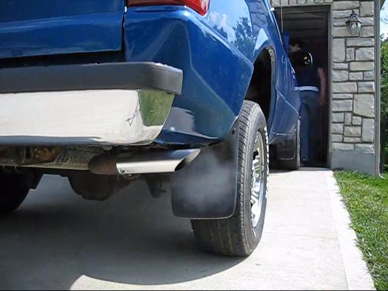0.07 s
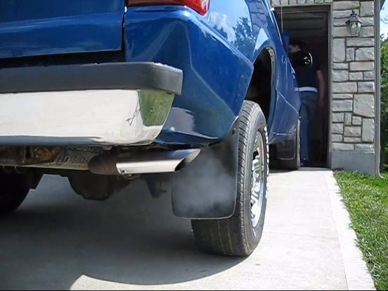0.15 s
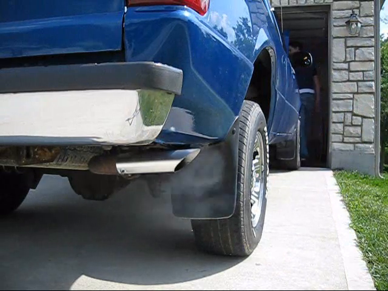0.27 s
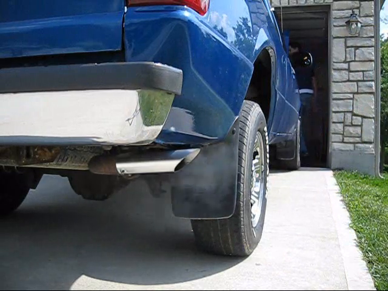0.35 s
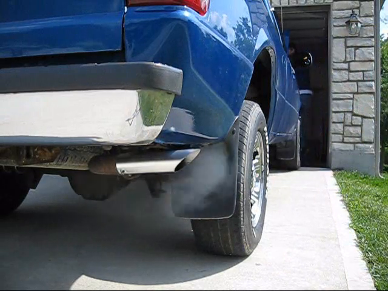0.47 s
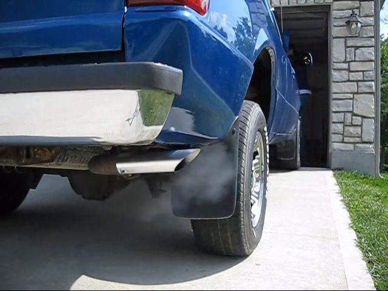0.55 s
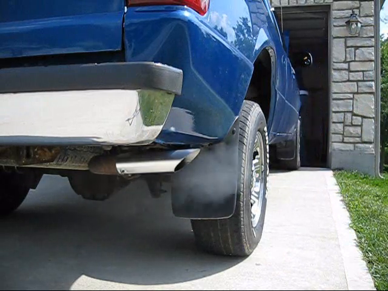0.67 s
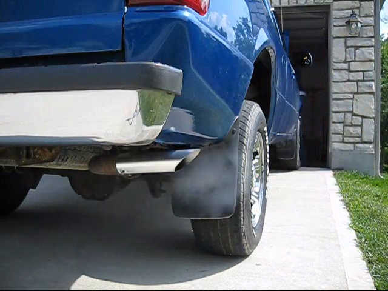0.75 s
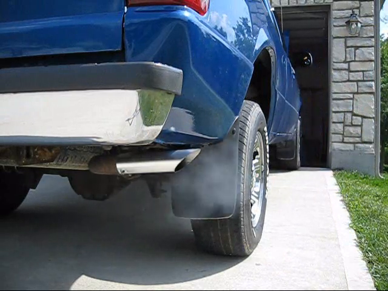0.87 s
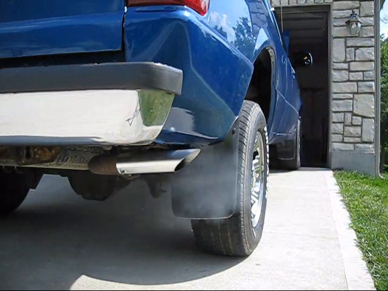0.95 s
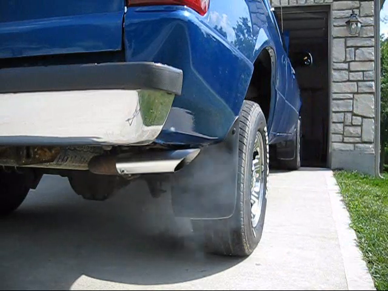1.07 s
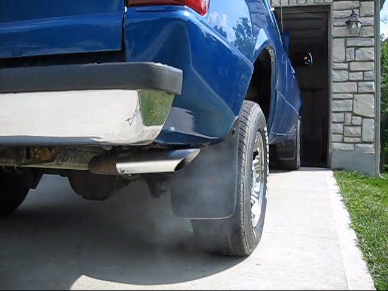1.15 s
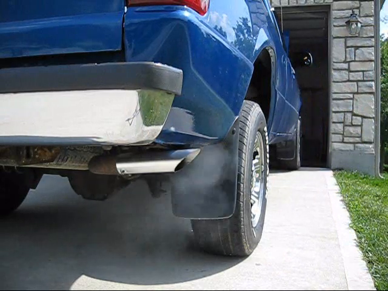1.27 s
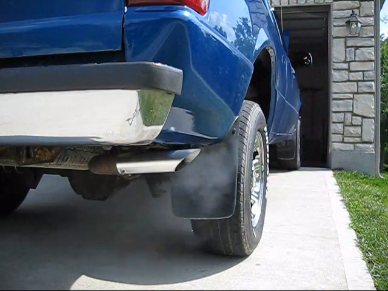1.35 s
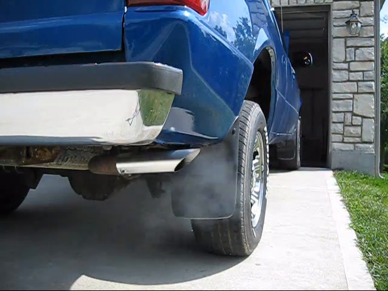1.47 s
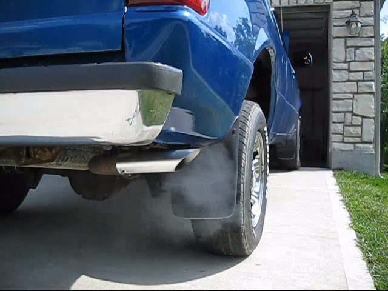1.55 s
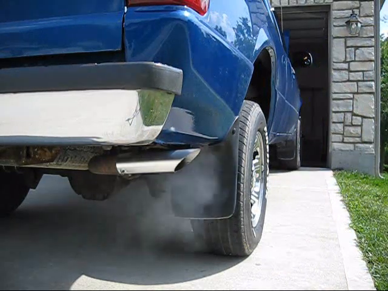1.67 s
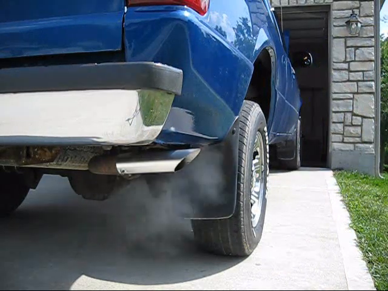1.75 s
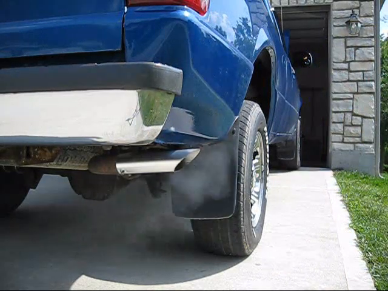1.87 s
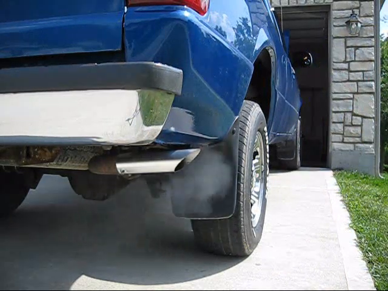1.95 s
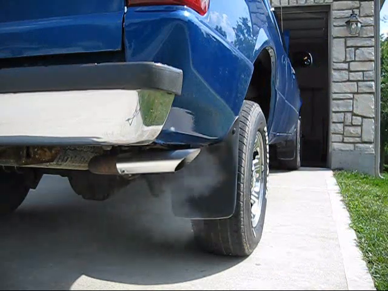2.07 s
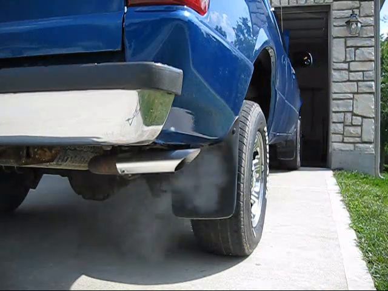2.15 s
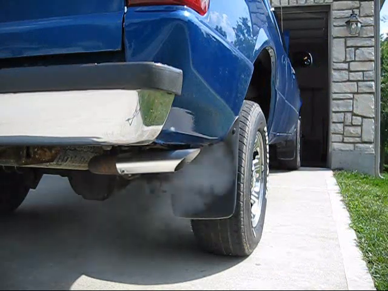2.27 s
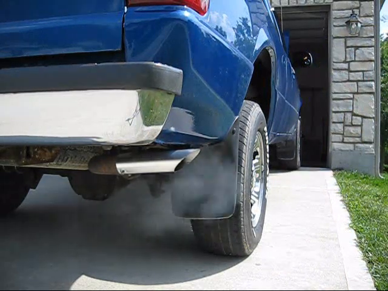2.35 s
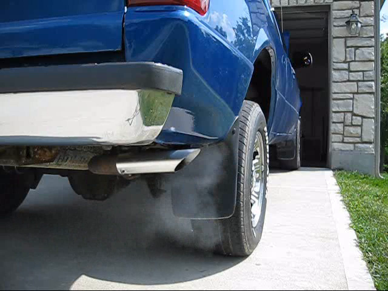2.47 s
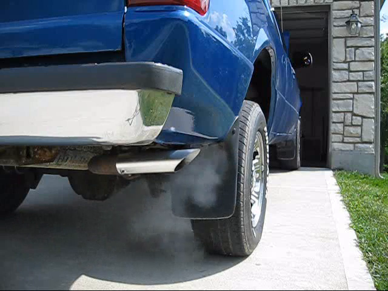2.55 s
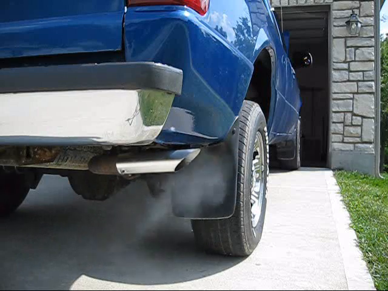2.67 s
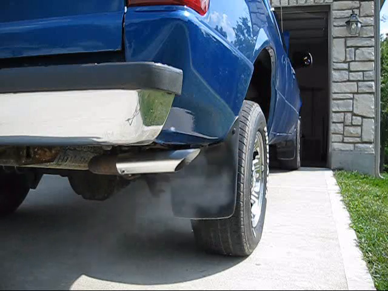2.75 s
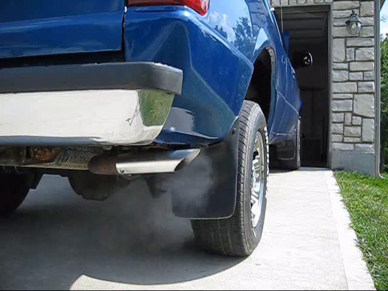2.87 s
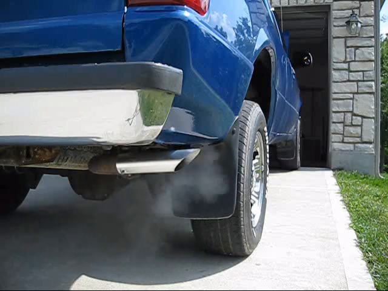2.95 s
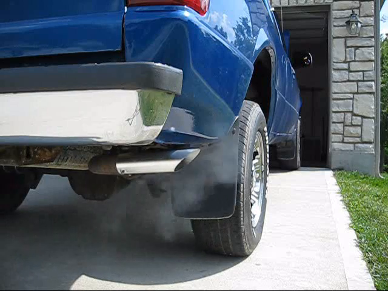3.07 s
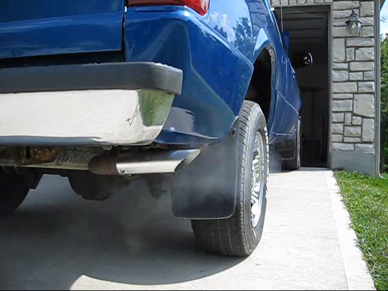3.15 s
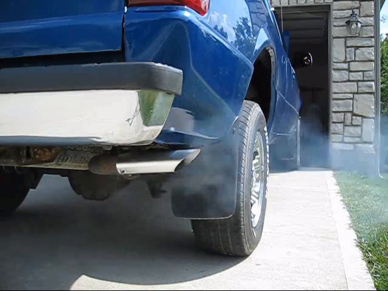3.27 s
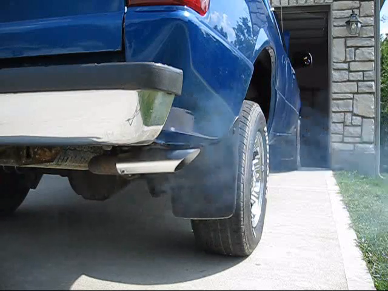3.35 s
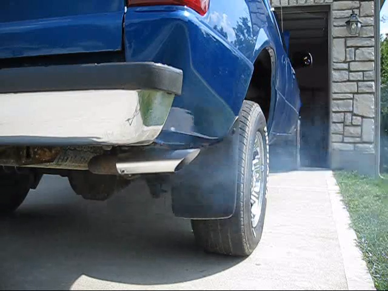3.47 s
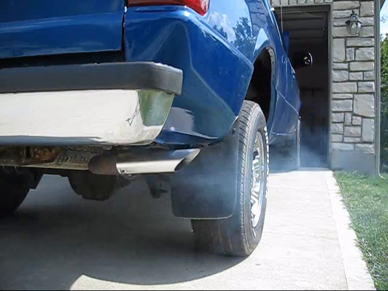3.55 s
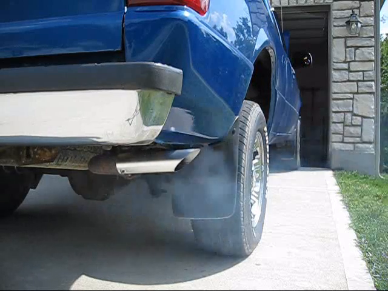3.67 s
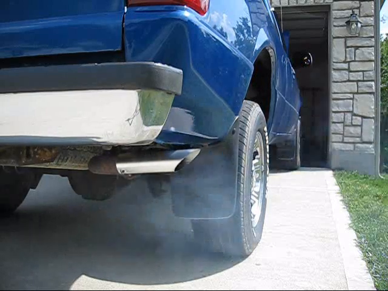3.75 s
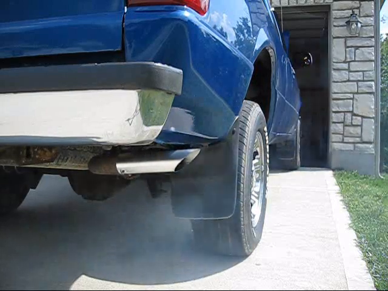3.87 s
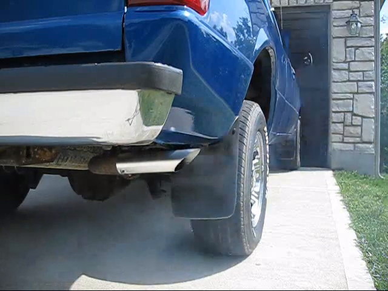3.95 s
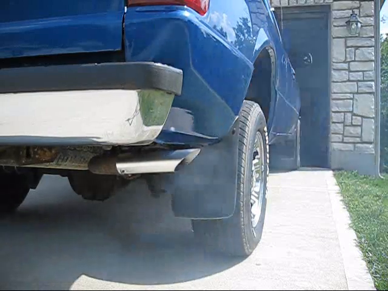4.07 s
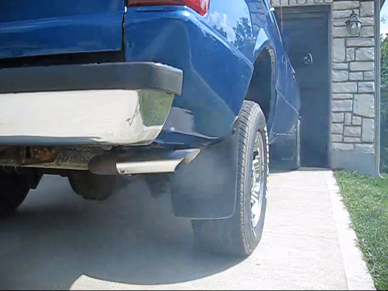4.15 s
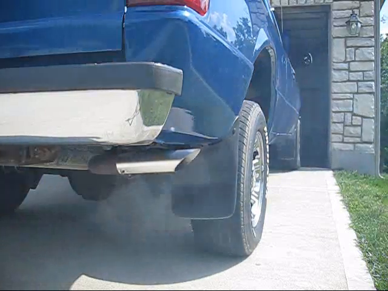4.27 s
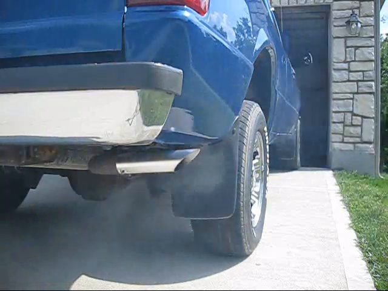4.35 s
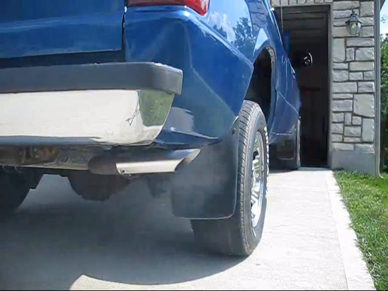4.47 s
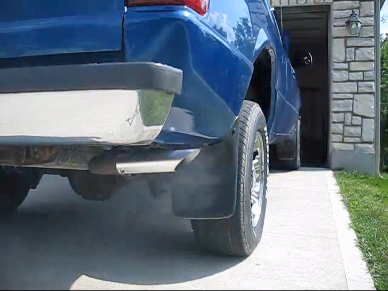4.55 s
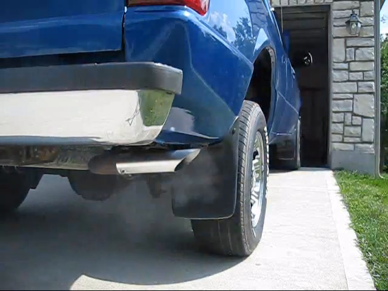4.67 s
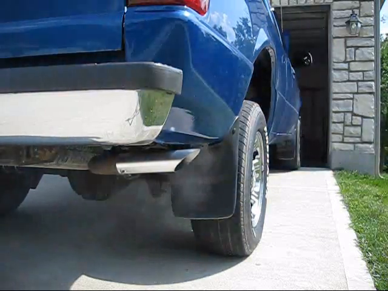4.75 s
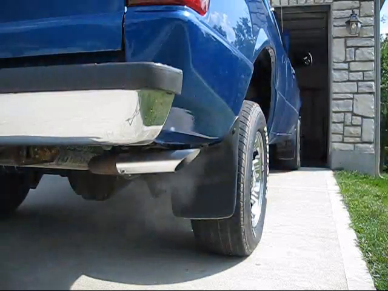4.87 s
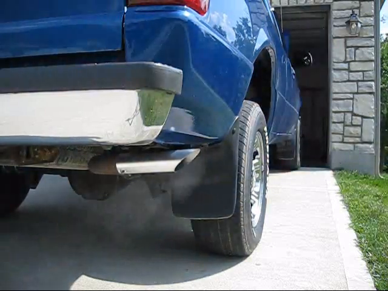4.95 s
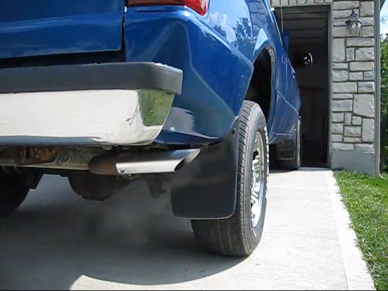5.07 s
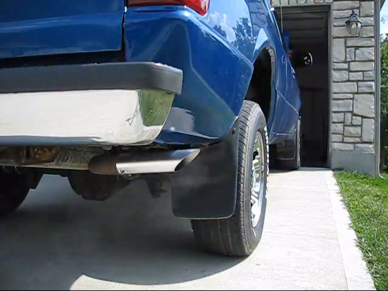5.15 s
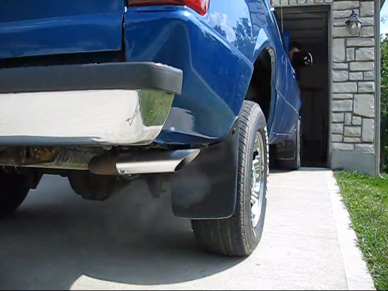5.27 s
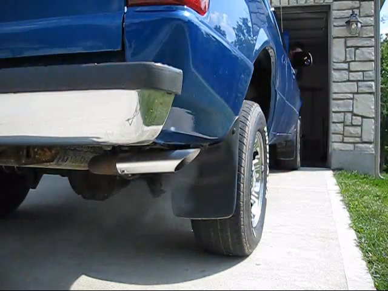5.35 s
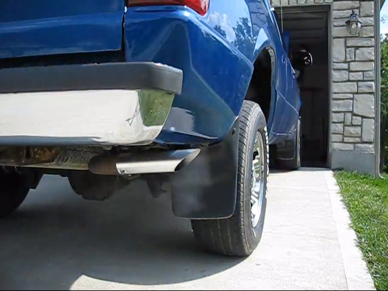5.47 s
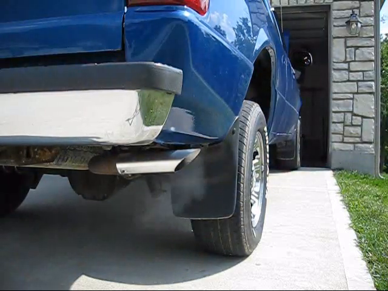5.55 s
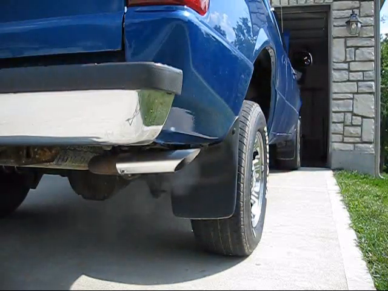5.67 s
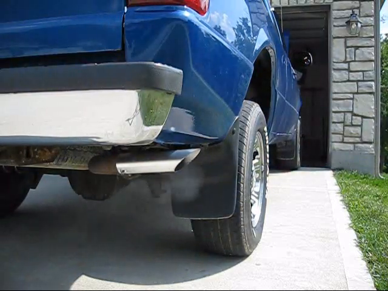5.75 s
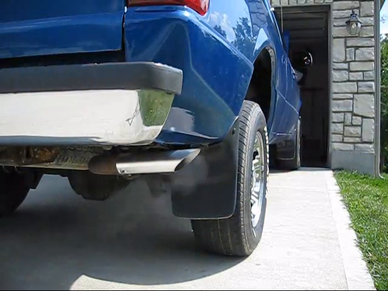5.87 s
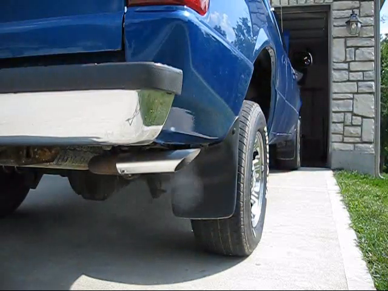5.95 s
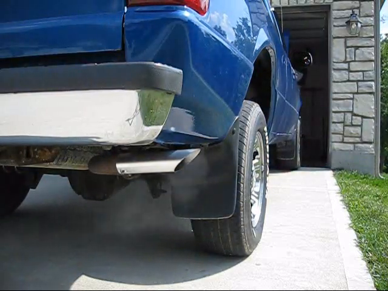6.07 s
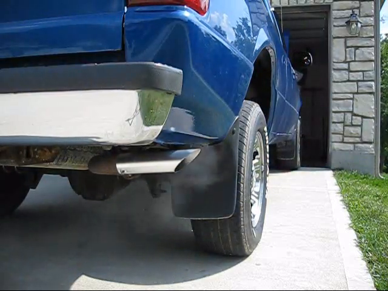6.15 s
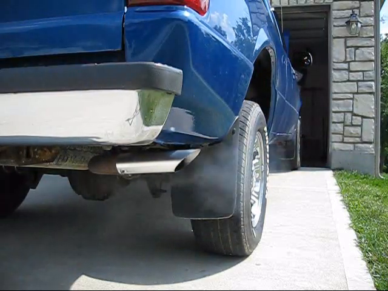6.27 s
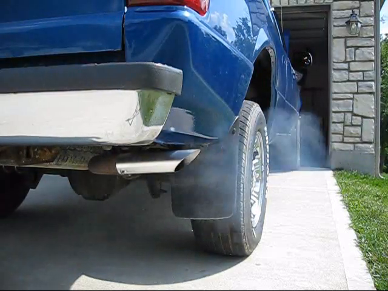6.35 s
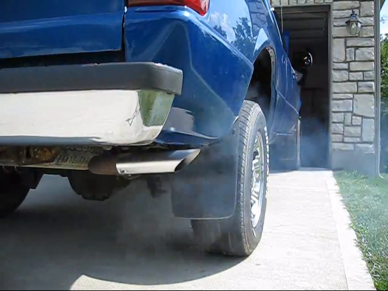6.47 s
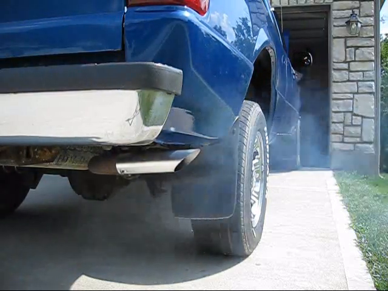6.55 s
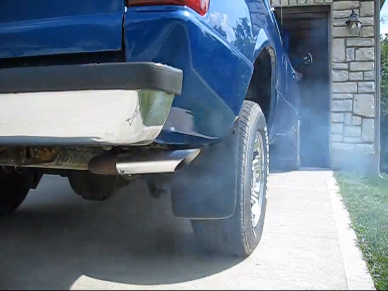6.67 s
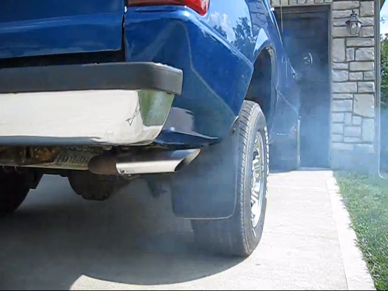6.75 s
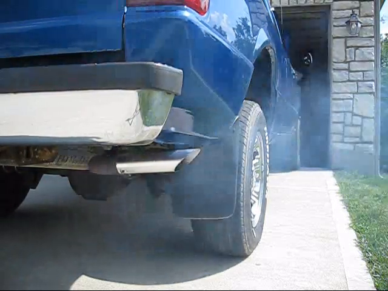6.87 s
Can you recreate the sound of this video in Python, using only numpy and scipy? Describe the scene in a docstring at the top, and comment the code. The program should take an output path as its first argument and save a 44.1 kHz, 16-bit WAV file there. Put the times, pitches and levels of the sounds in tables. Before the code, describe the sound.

A six-cylinder pickup idles outdoors, heard close to the tailpipe. For the first three seconds the exhaust throbs low and evenly, with a steady rush and hiss of gas and a very faint high belt squeak. A slight puff of wind touches the microphone around 0.6 seconds. At about 3.1 seconds the throttle opens with a short raspy bark, and the engine booms up in pitch, peaking near 3.6 seconds, then sinks back to idle by about 5.5. Gusts flap dully against the microphone around 4.2 to 4.5 seconds and again from 5.3 to 6.4. At about 6.2 seconds a second rev starts with another rasp, climbing higher than the first and staying high until the end, near 7 seconds. The hiss ducks slightly under the loudest booms and then recovers.

```python
"""A six-cylinder pickup idles and is revved twice, heard close to its tailpipe.
Each firing sends a pulse that booms in the pipe and rasps as the throttle opens.
The exhaust gas rumbles, rushes and hisses, and a belt squeaks faintly.
Gusts flap against the microphone of a small camera, mostly between the revs,
and the camera turns itself down under the loudest booms."""
import sys
import numpy as np
from scipy import signal
from scipy.fft import rfft, irfft
from scipy.io import wavfile
from scipy.ndimage import uniform_filter1d

SR = 44100
rng = np.random.default_rng(int(sys.argv[2]) if len(sys.argv) > 2 else 0)


def output_pcm(signal):
    """Save a mono or channel-first signal as 16-bit PCM at the path in sys.argv[1].

    Samples are clipped to [-1, 1] before scaling.
    """
    pcm = np.clip(np.atleast_2d(signal).T, -1, 1) * 32767
    wavfile.write(sys.argv[1], SR, np.round(pcm).astype(np.int16))


N = 304731
TIME = np.arange(N) / SR
BINS_HZ = np.maximum(np.fft.rfftfreq(N, 1 / SR), 1)

# presses of the throttle: t/s, rise/s, hold/s, opening kept afterwards/0-1, fading of the barks/(dB/s)
REVS = [(3.08, 0.22, 0.14, 0, 73), (6.211, 0.22, 0.17, 0.08, 38)]
# standing waves, the notes at which the exhaust pipe rings: f/Hz, width/Hz, level/dB
PIPE_NOTES = [(69.6, 14.8, -10), (139, 17.8, -0.5), (210.3, 18, -3), (277.5, 27, -6.5), (416, 75, -18),
              (770, 150, -8)]
# narrow peaks and one dip that the muffler and pipe tip give the gas noise: f/Hz, width/Hz, lift/dB
TIP_RESONANCES = [(778, 50, 5), (924, 38, 3.5), (1210, 12.5, 7.5), (1538, 8.1, 12.5), (1617, 23, 7),
                  (2250, 380, 14.5), (2180, 45, -15.5), (2907, 58, 6)]
# brief swells and dips of the gas noise: t/s, half length/s, rumble/dB, rush/dB, hiss/dB
GAS_SWELLS = [(2.08, .1, -2, 2, -0.5), (2.904, .08, -1, 3.5, -0.5), (3.71, 0.079, 3, 2, 4.5),
              (4.117, 0.075, 0, 1.5, 1.5), (6.92, 0.057, 2, 6.5, 6.5)]


def from_db(db):
    """Turn decibels into a gain to multiply by."""
    return 10 ** (np.asarray(db) / 20)


def rms_one(x):
    """Scale a signal to an average power of 1."""
    return x / np.sqrt(np.mean(x ** 2) + 1e-20)


def in_time(rows):
    """Join (time, value) points into a curve with a value at every sample."""
    return np.interp(TIME, *np.transpose(rows))


def bell(hz, centre_hz, width_hz):
    """How strongly a resonance answers each frequency, 1 at its centre."""
    return 1 / (1 + (2 * (hz - centre_hz) / width_hz) ** 2)


def noise(gain):
    """Noise of power 1, shaped by a gain for each frequency."""
    return rms_one(irfft(rfft(rng.standard_normal(N)) * gain, N))


def colour(points, resonances=()):
    """Gain at each frequency: a smooth curve with resonances on top."""
    hz, db = np.transpose(points)
    lift_db = sum(lift * bell(BINS_HZ, f, width) for f, width, lift in resonances)
    return from_db(np.interp(np.log(BINS_HZ), np.log(hz), db) + lift_db)


def wander(per_s):
    """A slow random drift with a typical size of 1."""
    return rms_one(np.interp(TIME * per_s, np.arange(1000), rng.standard_normal(1000)))


def per_firing(firings):
    """A random value for each firing, gliding to the next."""
    return np.interp(firings, np.arange(1000), rng.standard_normal(1000))


def puffs(firings, sharpness, scatter_db):
    """A loudness curve that swells at each firing, every time with its own strength."""
    which = np.round(firings).astype(int)
    strength = from_db(scatter_db * np.clip(rng.standard_normal(1000), -2, 2))[which % 1000]
    return rms_one(strength * np.exp(sharpness * (np.cos(2 * np.pi * firings) - 1)))


def throttle(release_s=0.22):
    """How far the throttle is open, 0-1: each press rises, holds and falls back."""
    return sum(np.interp(TIME, s + np.cumsum([0, rise, hold, release_s]), [0, 1, 1, kept])
               for s, rise, hold, kept, _ in REVS)


def level_db(rate, load, idle_db, speed_db, load_db):
    """Start at idle_db; add speed_db at twice idle speed and load_db at full throttle."""
    idle_hz = 35
    return idle_db + speed_db * 2 * (1 - idle_hz / rate) + load_db * load


def in_tune(hz, load, damping=0.65):
    """How well a tone matches a low note of the pipe, about 0-1; fast gas weakens the ringing."""
    return (1 - damping * load) * sum(bell(hz, f, width) for f, width, _ in PIPE_NOTES[:3])


def pipe_ring(x):
    """Each note of the pipe rings on from one pulse to the next."""
    out = 0
    for k, (hz, width, db) in enumerate(PIPE_NOTES):
        r = np.exp(-np.pi * width / SR)
        poles = [1, -2 * r * np.cos(2 * np.pi * hz / SR), r * r]
        ringing = (1 - r * r) / 2 * signal.lfilter([1, 0, -1], poles, x)
        out = out + (-1) ** k * from_db(db) * ringing
    return out


def boom(rate, load, phase, strength):
    """The pulses' tones other than thump and drone swell as they slide through the pipe's notes."""
    # overtones (the halves come from unequal cylinder banks): multiple of the firing rate, level/dB
    overtones = [(1.5, 2), (2.5, -2.5), (3, 0.5), (3.5, -9), (4, -1), (4.5, -10.5), (5, -5.5), (6, -5),
                 (7, -12.5), (8, -9.5)]
    # the boom wavers: t/s, level/dB
    waver = [(0, -0.5), (1.2, 1), (2.7, -1.5), (3.2, 4.5), (4.1, -5), (4.62, -0.5), (5.2, -7), (6.2, 3),
             (6.9, 0.5)]
    db = level_db(rate, load, idle_db=-26, speed_db=12.4, load_db=2.9) + in_time(waver)
    tones = sum(from_db(level) * np.cos(2 * np.pi * multiple * phase) for multiple, level in overtones)
    return from_db(db) * pipe_ring(strength * tones)


def firing_pulses(rate, load, firings, jitter=0.0064, idle_rough_db=3.5):
    """Each firing pushes out one pulse, never quite on time; the fuel burns least evenly at idle."""
    phase = firings + jitter * per_firing(firings)
    strength = from_db(idle_rough_db * rate.min() / rate * per_firing(firings))
    # the firing tone and its octave, thump and drone, grow louder when they match a note of the pipe
    thump_db = level_db(rate, load, idle_db=-51, speed_db=13.9, load_db=20.7)
    thump_db += 22.5 * in_tune(rate, load)
    drone_db = level_db(rate, load, idle_db=-48.5, speed_db=20.23, load_db=15.5)
    drone_db += 12.5 * in_tune(2 * rate, load)
    thump = from_db(thump_db) * np.cos(2 * np.pi * phase)
    drone = from_db(drone_db) * np.cos(4 * np.pi * phase)
    return boom(rate, load, phase, strength) - np.sqrt(2) * strength * (thump + drone)


def gas_rumble(rate, load, firings, swell_db):
    """The jet of gas leaving the pipe rumbles, throbbing with each firing."""
    # deep noise: f/Hz, level/dB
    spectrum = [(15, -34), (30, -17), (48, -18), (65, -5), (110, 3.5), (160, 2), (250, 0), (340, -5),
                (500, -22.5), (900, -49)]
    db = level_db(rate, load, idle_db=-32, speed_db=12.1, load_db=-0.69) + swell_db + wander(per_s=10)
    return from_db(db) * puffs(firings, sharpness=0.19, scatter_db=2.6) * noise(colour(spectrum))


def pipe_echo(reflection, spacing_hz=69.3):
    """Gas noise runs up the pipe and back, which boosts evenly spaced frequencies."""
    return np.abs(1 / (1 - reflection * np.exp(-2j * np.pi * BINS_HZ / spacing_hz)))


def gas_rush(rate, load, firings, swell_db):
    """Gas rushes through the muffler and the pipe tip and makes them ring."""
    # mid-range noise: f/Hz, level/dB
    spectrum = [(200, -9.5), (400, 1.5), (600, 1.5), (800, 0.5), (1100, -2.5), (1400, -3), (1900, -10),
                (2500, -21.5), (3300, -23.5), (4200, -19), (6000, -40)]
    db = level_db(rate, load, idle_db=-34, speed_db=8.34, load_db=2) + swell_db
    flow = noise(colour(spectrum, TIP_RESONANCES) * pipe_echo(reflection=0.21))
    return from_db(db) * puffs(firings, sharpness=0.1, scatter_db=1.43) * flow


def gas_hiss(rate, load, firings, swell_db):
    """The gas also hisses, almost steadily, with a slight flicker."""
    # bright noise: f/Hz, level/dB
    spectrum = [(900, -12.5), (1600, 2), (2300, 4.5), (3100, 6), (3900, 0.5), (4600, 2), (5200, -0.5),
                (6100, -0.5), (7000, -4), (9000, -7), (10300, -5.5), (11700, -5.5), (12500, -7.5)]
    db = level_db(rate, load, idle_db=-36, speed_db=3.6, load_db=0.98) + swell_db
    db += 0.19 * wander(per_s=8.2)
    flow = noise(colour(spectrum) * pipe_echo(reflection=0.2))
    return from_db(db) * puffs(2 * firings, sharpness=0.012, scatter_db=0.75) * flow


def muffler_roar(rate, load, firings):
    """The gas in each pulse roars in the hollow of the muffler, most at high speed."""
    db = level_db(rate, load, idle_db=-56.5, speed_db=19.5, load_db=8.9)
    hollow = bell(BINS_HZ, centre_hz=730, width_hz=210) * pipe_echo(reflection=0.36)
    return from_db(db) * puffs(firings, sharpness=1.0, scatter_db=4.5) * noise(hollow)


def whistles_and_belt(firings):
    """The engine whistles steadily, and its belt squeaks once every six firings."""
    # thin whistles: f/Hz, width/Hz, relative level/dB
    whistles = [(5856, 30, -2), (11292, 15, -9), (11578, 30, -4), (11702, 35, 0)]
    steady = sum(from_db(db) * noise(bell(BINS_HZ, f, width)) for f, width, db in whistles)
    squeak = noise(bell(BINS_HZ, centre_hz=10110, width_hz=140))
    return steady + from_db(-1) * puffs(firings / 6, sharpness=1.6, scatter_db=-1.5) * squeak


def wind_flutter(gusts, edge_s=0.022):
    """Churning air flutters at the microphone for as long as a gust lasts."""
    level = 0
    for s, length, db in gusts:
        inside_s = np.minimum(TIME - s, s + length - TIME)
        level = level + from_db(db) * np.clip(0.5 + inside_s / (2 * edge_s), 0, 1)
    churn = noise(bell(BINS_HZ, centre_hz=230, width_hz=490) ** 2)
    return level * from_db(-11 + 0.3 * wander(per_s=33)) * churn


def small_flaps(gusts, per_s=16, scatter_db=2.5, centre_hz=337, spread_octaves=0.28):
    """Weaker swirls of air arrive unevenly in each gust: rows of t/s, level/dB, f/Hz."""
    rows = []
    for start, length, db in gusts:
        times = np.cumsum(rng.uniform(0.3, 1.7, 60)) / per_s
        scatter = rng.standard_normal((len(times), 2))
        rows += [(start + s, db + scatter_db * louder, centre_hz * 2 ** (spread_octaves * higher))
                 for s, (louder, higher) in zip(times, scatter) if s < length]
    return rows


def wind_flaps(gusts, fade_s=0.0028, grit=0.81):
    """Each swirl that hits the microphone is a dull flap: one pressure swing with rough noise on it."""
    # the hardest flaps: t/s, relative level/dB, f/Hz (sets the pitch of both swing and noise)
    hard_flaps = [(.578, -14, 390), (0.728, -14, 310), (4.25, -4.5, 430), (5.3, -9.5, 388),
                  (5.406, -7.5, 350), (5.449, -9, 350), (5.491, -4.5, 303), (5.506, -7.5, 370),
                  (5.547, -11, 520), (5.575, -4, 410), (5.581, -4.5, 390), (5.623, -5, 415.5),
                  (5.644, -5, 470), (5.762, -7, 338), (5.877, -10.5, 470), (5.91, -1.5, 477),
                  (6.012, -6.5, 507), (6.045, -5.5, 406), (6.064, -4, 523), (6.215, -6, 444),
                  (6.245, -4.5, 590)]
    out, t = np.zeros(N), np.arange(-600, 600) / SR
    for s, db, hz in hard_flaps + small_flaps(gusts):
        lowpass = signal.butter(4, 1.62 * hz, fs=SR, output="sos")
        churn = signal.sosfilt(lowpass, rng.standard_normal(2 * len(t)))[len(t):]
        swing = np.cos(2 * np.pi * (0.79 * hz * t + rng.random()))
        flap = (swing + grit * rms_one(churn)) * np.exp(-np.abs(t / fade_s) ** 1.52)
        start = round(s * SR) - len(t) // 2
        out[start:start + len(t)] += from_db(db) * flap / np.abs(flap).max()
    return signal.sosfilt(signal.butter(6, [90, 1150], "band", fs=SR, output="sos"), out)


def wind():
    """Gusts blow on the microphone: a low flutter with flaps on top."""
    # spells of wind: t/s, length/s, relative level/dB
    gusts = [(0.552, 0.073, -19), (4.218, 0.31, -16), (5.432, 0.45, -13), (5.999, 0.41, -13)]
    return wind_flutter(gusts) + from_db(-0.5) * wind_flaps(gusts)


def rasp(firings, bark_db=-15, rise_db_per_s=197, stop_db_per_s=130):
    """With the throttle open, each pulse sharpens and leaves the pipe as a short bark with a tick."""
    # noise of a bark: f/Hz, level/dB
    spectrum = [(300, -26), (700, 13), (1100, -3), (1500, 12), (1900, -7.5), (2500, -3.5), (3600, -9.5),
                (4600, -15), (6000, -14), (12000, -23)]
    level = 0
    # the barks peak at full throttle, fade while it is held and die away when it is eased
    for s, rise, hold, _, fade in REVS:
        t = TIME - s - rise
        pressed_db = np.minimum(rise_db_per_s * t, -fade * t)
        eased_db = stop_db_per_s * np.maximum(t - hold, 0)
        level = level + from_db(bark_db + pressed_db - eased_db)
    barks = puffs(firings, sharpness=5, scatter_db=2) * noise(colour(spectrum, TIP_RESONANCES))
    tick_band = bell(BINS_HZ, centre_hz=9000, width_hz=35100)
    ticks = puffs(firings, sharpness=5, scatter_db=1) * noise(tick_band)
    # the square root lets the ticks outlast the barks
    return level * barks + from_db(-38) * np.sqrt(level) * ticks


def gain_control(x, threshold_db=-8.5, bass_db=3.0, attack_s=0.027, release_db_per_s=42):
    """The camera turns itself down while the boom is loud, so the hiss dips and then recovers."""
    bass = signal.sosfilt(signal.butter(1, 100, fs=SR, output="sos"), x)
    power = uniform_filter1d((x + from_db(bass_db) * bass) ** 2, size=SR // 30)
    over_db = np.maximum(10 * np.log10(np.abs(power) + 1e-12) - threshold_db, 0)
    recovery_db = release_db_per_s * TIME
    held_db = np.maximum.accumulate(over_db + recovery_db, axis=-1) - recovery_db
    r = np.exp(-1 / (attack_s * SR))
    cut_db = signal.lfilter([1 - r], [1, -r], held_db)
    return x * from_db(-cut_db)


def scene():
    """The exhaust follows the engine speed and the throttle; whistles, belt and wind join it."""
    # engine speed: t/s, firing rate/Hz
    engine_speed = [(0.0, 35.55), (1.1, 34.75), (2.3, 35.97), (3.17, 34.87), (3.32, 59.54), (3.49, 81.74),
                    (3.64, 83.67), (3.8, 73.97), (4.15, 58.47), (4.42, 47.85), (4.95, 39.89), (5.6, 36.53),
                    (6.26, 35.8), (6.42, 57.36), (6.62, 92.46), (6.78, 104.62), (6.91, 104.36)]
    rate, load = in_time(engine_speed), throttle()
    firings = np.cumsum(rate) / SR  # how many firings so far
    rumble_swell, rush_swell, hiss_swell = sum(
        np.outer(lifts_db, np.exp(-((TIME - s) / half) ** 2)) for s, half, *lifts_db in GAS_SWELLS)
    mix = (firing_pulses(rate, load, firings)
           + gas_rumble(rate, load, firings, rumble_swell)
           + gas_rush(rate, load, firings, rush_swell)
           + gas_hiss(rate, load, firings, hiss_swell)
           + muffler_roar(rate, load, firings)
           + from_db(-56.5) * whistles_and_belt(firings)
           + wind()
           + rasp(firings))
    return mix[None]


def record(dry, notch_hz=7896, cutoff_hz=12550):
    """The camera lowers loud parts, rounds off peaks and cuts a narrow treble band and the very top."""
    levelled = gain_control(dry)
    rounded = levelled / (1 + levelled ** 6) ** (1 / 6)
    notch = signal.tf2sos(*signal.iirnotch(notch_hz, Q=7.8, fs=SR))
    notched = signal.sosfilt(np.vstack([notch, notch]), rounded)
    return signal.sosfilt(signal.ellip(12, 0.1, 80, cutoff_hz, fs=SR, output="sos"), notched)


dry = scene()
out = record(dry)
output_pcm(out)
```